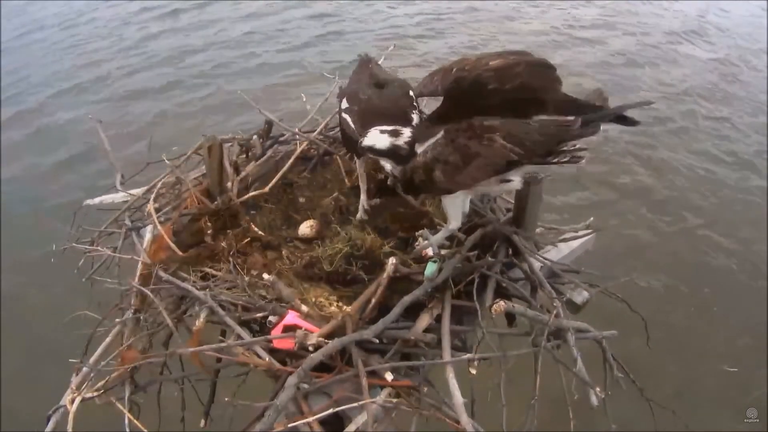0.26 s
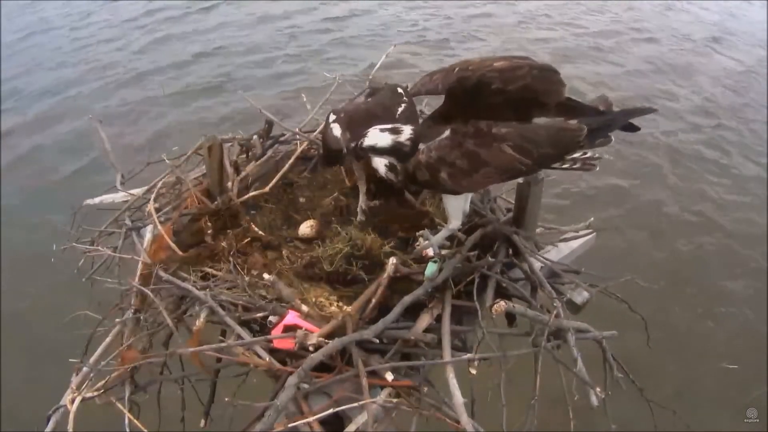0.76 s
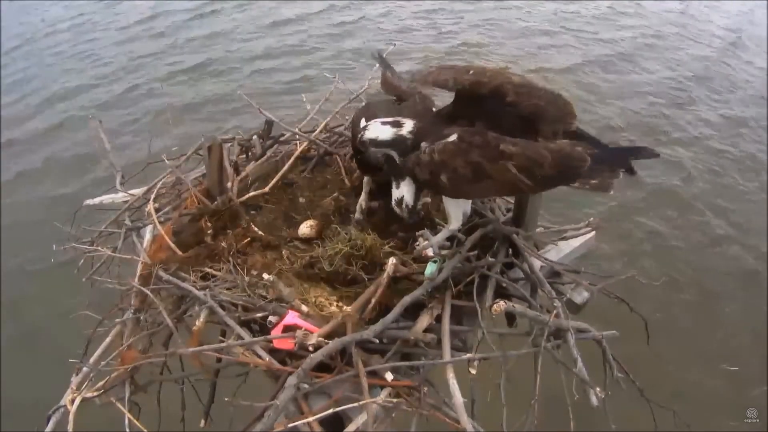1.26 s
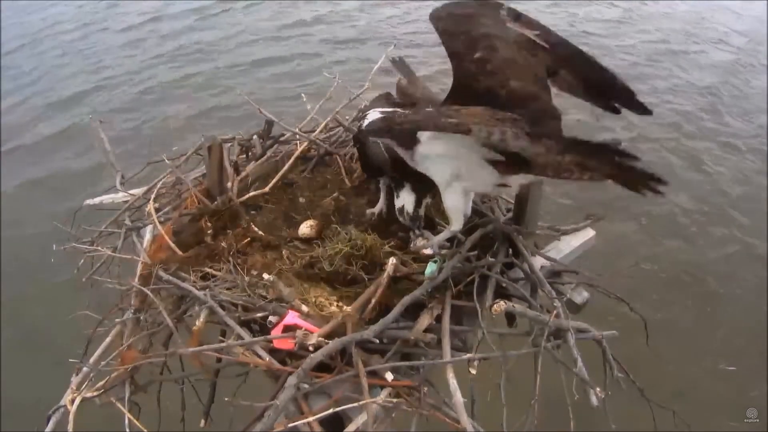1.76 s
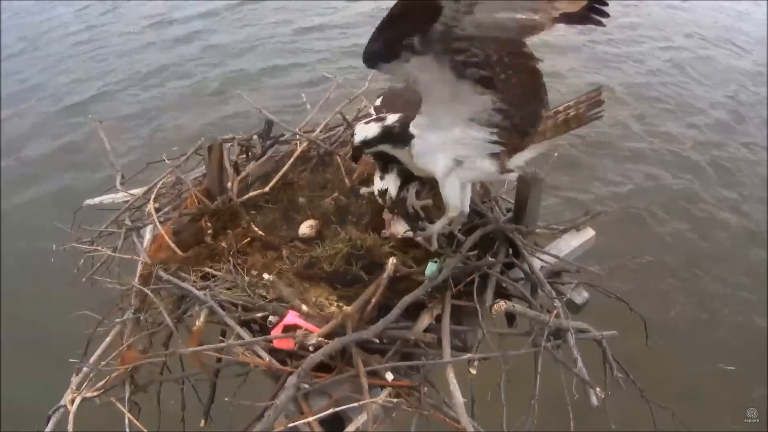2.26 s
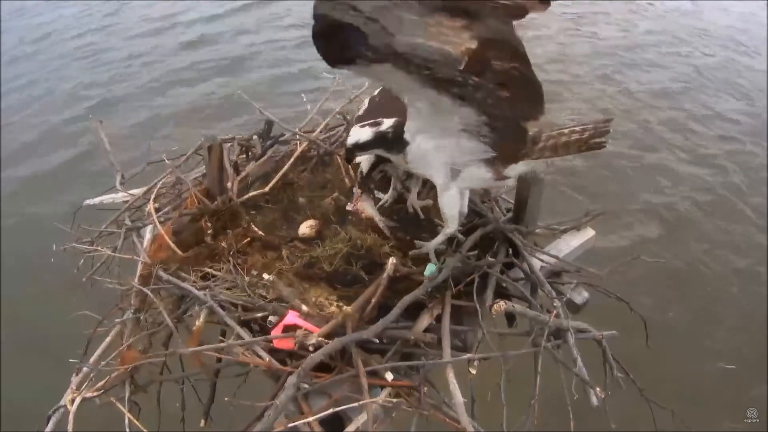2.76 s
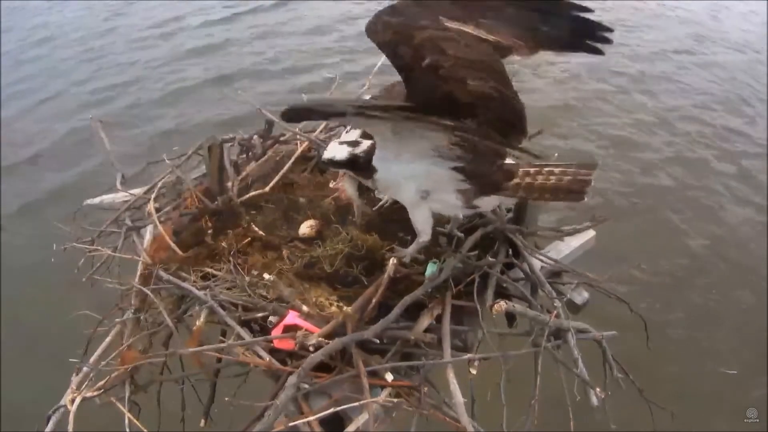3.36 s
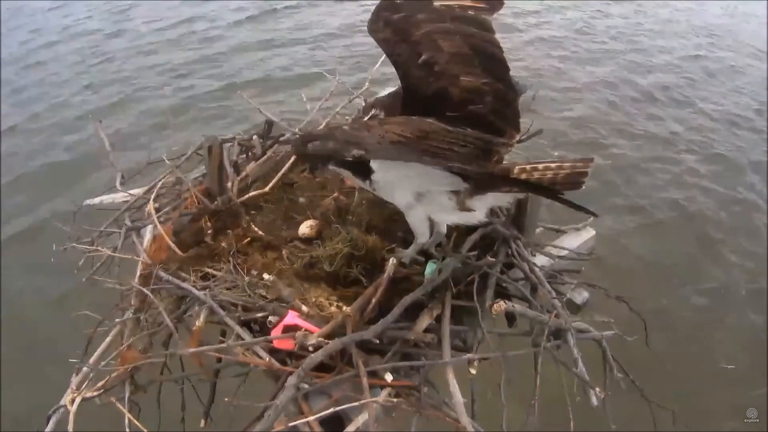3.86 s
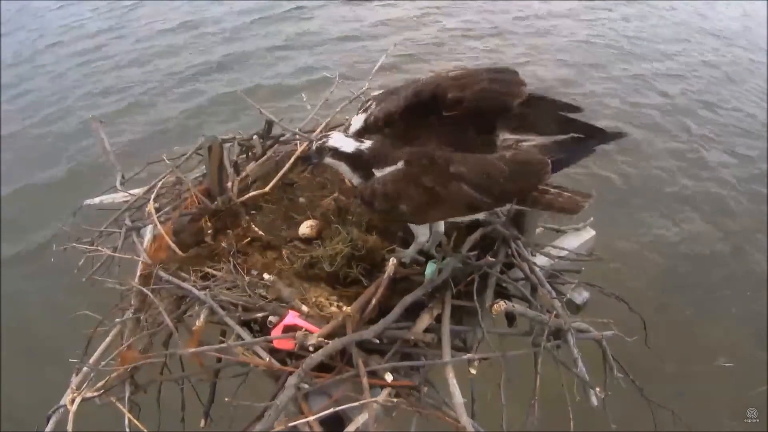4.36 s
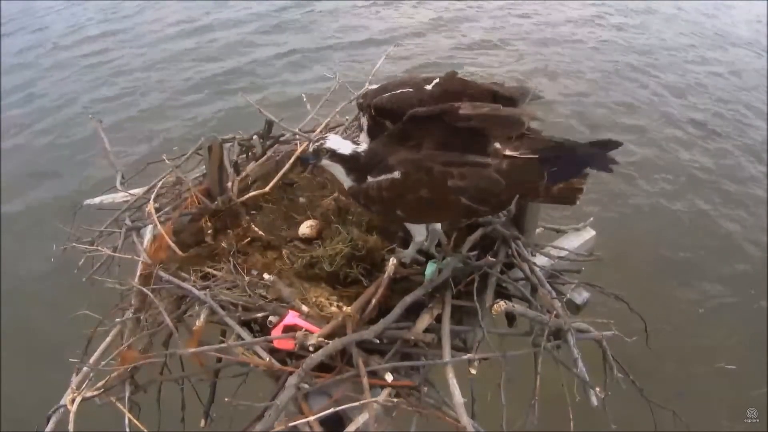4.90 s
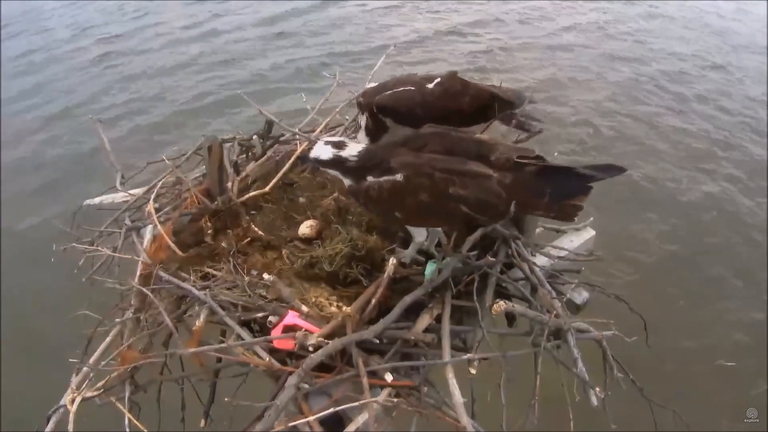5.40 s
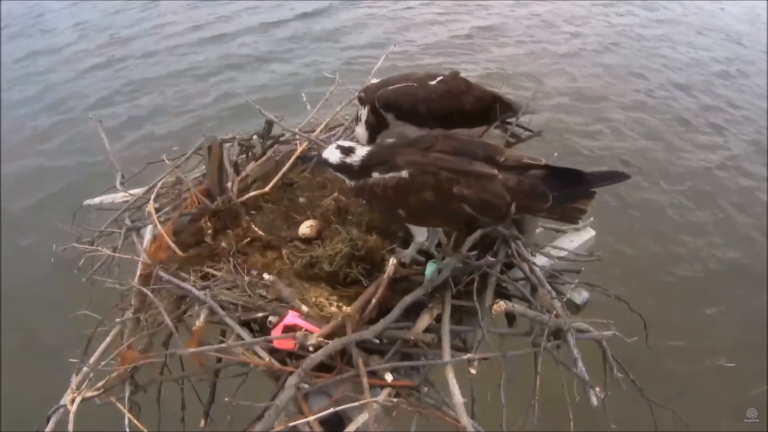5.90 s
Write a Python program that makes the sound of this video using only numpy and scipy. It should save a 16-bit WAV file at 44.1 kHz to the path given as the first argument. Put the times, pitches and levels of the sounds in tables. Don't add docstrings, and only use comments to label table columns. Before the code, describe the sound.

Close, piercing bird chirps tumble out rapidly, then give way to spaced, breathy, cracking whistles above a quiet hiss of open water.

```python
import sys
import numpy as np
from scipy import signal
from scipy.fft import rfft, irfft
from scipy.io import wavfile
from scipy.ndimage import uniform_filter1d

SR = 44100
rng = np.random.default_rng(int(sys.argv[2]) if len(sys.argv) > 2 else 0)


def wav_out(sig):
    wavfile.write(sys.argv[1], SR, np.round(np.clip(np.atleast_2d(sig).T, -1, 1) * 32767).astype(np.int16))


def natural_amplitude(level_db):
    exponent = np.asarray(level_db, float) / 20
    return 10 ** exponent


N = 270774


def at_level(x, db):
    return x * natural_amplitude(db) / np.sqrt(np.mean(x ** 2))


def ring(x, hz, width):
    return signal.lfilter(*signal.iirpeak(hz, hz / width, fs=SR), x)


def walk(rate):
    k = int(SR / rate)
    steps = np.repeat(rng.standard_normal(N // k + 1), k)
    return 1.58 * uniform_filter1d(uniform_filter1d(steps, k), k)[:N]


def unroll(table):
    s, *columns = np.transpose(table)
    at = np.arange(int(s[0] * SR), min(int(s[-1] * SR), N))
    cut = at[-1] == N - 1
    to_end = s[-1] * SR + 88 * cut - at
    fade = np.clip(np.minimum(at - at[0], to_end) / (.002 * SR), 0, 1)

    def glide(column):
        return uniform_filter1d(np.interp(at / SR, s, column), size=88)

    return at, fade, glide, columns


def peaked(s, rise, fall, hz, db, edges_db, octave_db=None):
    levels = (db + edges_db[0], db, db + edges_db[1])
    rows = np.transpose([(s - rise, s, s + fall), hz, levels])
    if octave_db is None:
        return rows
    return np.c_[rows, rows[:, 2] + octave_db + (-4.5, 0, -19.5)]


def whistles(notes, flutter_db, steady_db):
    out, flutter, tremble = np.zeros(N), walk(190), walk(400)
    chaos = (walk(340) + 1j * walk(340)) / np.sqrt(2)
    for note in notes:
        at, fade, glide, (hz, *partials_db) = unroll(note)
        pitch = glide(hz)
        phase = 2 * np.pi * np.cumsum(pitch * (1 + .002 * tremble[at])) / SR
        weak = (steady_db - glide(np.max(partials_db, axis=0))) / 16
        hurried = np.abs(np.gradient(pitch)) * SR / 1.3e5
        rough = np.clip(np.maximum(weak, 0) + hurried, .05, .8)
        swing = np.sqrt(1 - rough ** 2) + rough * chaos[at]
        for k, db in enumerate(partials_db):
            loudness = glide(natural_amplitude(db / 3)) ** 3
            wave = np.imag(swing * np.exp(1j * (k + 1) * phase))
            out[at] += fade * loudness * np.sqrt(2) * wave
    return out * natural_amplitude(flutter_db * flutter)


# (start [s], length [s], top pitch [Hz], level [dB], swell [dB])
ARCHES = [
    (.128, 0.056, 4816, -29.5, .1),
    (.372, 0.059, 4827, -24.5, 1),
    (.615, 0.065, 4827, -26, 4.5),
    (.853, 0.057, 4684, -31, -17.5),
    (1.096, 0.084, 4710, -26, -3.5),
]
# (time [s], depth [dB], lasting step [dB])
CATCHES = [
    (.167, -7, -4),
    (.414, -13, -5),
    (.665, -12.5, -0.5),
    (.871, -5, -1.5),
    (1.131, -9, -1.3),
    (1.157, -14, -5),
]


def arches():
    notes = []
    u = np.linspace(-1, 1, num=60)
    for s, length, hz, db, swell_db in ARCHES:
        t = s + length * (u + 1) / 2
        level_db = db + swell_db * u / 2 - 28 * np.abs(u) ** 3.7
        for catch, depth_db, step_db in CATCHES:
            level_db = level_db + depth_db * np.exp(-((t - catch) / .002) ** 2)
            level_db = level_db + step_db * (t > catch) * (catch > s)
        notes.append(np.transpose([t, hz - 455 * u ** 2, level_db]))
    return notes


# (peak time [s], rise [s], fall [s], pitch [Hz], level [dB])
PEEPS = [
    (.081, 0.021, 0.018, 4524, -34.5),
    (0.299, .006, .025, 4506, -34),
    (.317, 0.015, 0.013, 4490, -34.5),
    (.545, 0.0086, 0.036, 4360, -45.5),
    (.807, .011, 0.0098, 4480, -31.5),
    (1.035, 0.018, 0.014, 4480, -31),
    (1.295, 0.016, 0.013, 4420, -37),
]


def peeps():
    return [peaked(s, rise, fall, (hz, hz, hz), db, (-23.5, -24)) for s, rise, fall, hz, db in PEEPS]


# (start [s], length [s], from pitch [Hz], to pitch [Hz], level [dB])
STROKES = [(0.112, .022, 4220, 3150, -60.5), (0.337, .012, 4740, 5010, -39), (0.346, .013, 5140, 4500, -42),
           (.35, .022, 4020, 3180, -42.5), (0.566, 0.023, 4130, 4170, -52),
           (0.581, 0.024, 5240, 4470, -37.5), (0.594, 0.024, 3950, 3285, -41.5),
           (0.775, 0.022, 4680, 5780, -61.5), (0.818, 0.046, 4400, 3220, -50.5),
           (1.06, 0.023, 3760, 4010, -40), (1.073, 0.021, 4020, 3230, -44),
           (1.268, .018, 4800, 5450, -46.5), (1.314, .022, 4250, 4020, -48),
           (1.328, 0.061, 4070, 4510, -37.5), (1.367, .05, 5140, 5280, -39.5),
           (1.409, .022, 5290, 4750, -48), (1.902, 0.021, 4050, 3250, -38),
           (1.979, 0.028, 3770, 2824, -42.5), (2.192, 0.019, 4440, 6300, -41),
           (2.208, 0.028, 6370, 5650, -43.5), (2.232, 0.02, 4130, 3980, -40),
           (2.247, 0.015, 4010, 3150, -33.5), (2.316, 0.019, 3460, 2970, -39), (6.09, .05, 4100, 3980, -57)]


def strokes():
    notes = []
    u, landing = np.linspace(0, 1, num=20), .75
    travel = np.sin(np.pi / 2 * np.clip(u / landing, 0, 1)) ** 2
    for s, length, from_hz, to_hz, db in STROKES:
        level_db = db + np.interp(u, (0, landing, 1), (-10, 0, -15))
        notes.append(np.transpose([s + length * u, from_hz + (to_hz - from_hz) * travel, level_db]))
    return notes


# (peak time [s], rise [s], fall [s], pitch [Hz], level [dB])
TAILS = [
    (.195, 0.014, .01, 2680, -54),
    (0.443, 0.023, .014, 2650, -48),
    (.692, 0.014, 0.011, 2700, -55),
    (.922, 0.02, .013, 2690, -51.5),
    (1.2, .01, 0.0066, 2690, -52),
    (1.228, .015, 0.019, 2410, -57.5),
    (2.193, 0.0063, 0.0113, 2660, -50.5),
    (2.906, .05, .019, 2027, -52),
    (3.05, 0.0054, 0.013, 2480, -54),
]


def tails():
    notes, speed = [], 25000
    for s, rise, fall, hz, db in TAILS:
        pitches = (hz + speed * min(rise, .02), hz, hz - speed * fall / 4)
        notes.append(peaked(s, rise, fall, pitches, db, (-12.5, -15.5)))
    return notes


# (start [s], length [s], upper pitch [Hz], upper level [dB], lower level [dB])
RASPS = [
    (2.814, 0.045, 4100, -48.5, -57),
    (3.491, 0.082, 4140, -46.5, -59),
    (3.987, .125, 4080, -43, -60),
    (4.716, 0.1, 4260, -46, -59),
]


def rasps():
    notes = []
    for s, length, hz, db, low_db in RASPS:
        up = length * .88
        notes.append(peaked(s + up, up, length - up, (hz * .99, hz, hz * .98), db, (-10, -11)))
        notes.append(peaked(s + up, up, length - up, (3220, 3220, 3220), low_db, (1.5, -1.5)))
    return notes


# (time [s], pitch [Hz], effort [dB], octave over fundamental [dB])
HOLDS = [
    [(2.594, 2823, -40.5, -2.5), (2.648, 2823, -37, 13.5), (2.707, 2917, -35, -7.5), (2.759, 2949, -37, -6),
     (2.798, 3052, -35, 6.5), (2.817, 3050, -39.5, -16)],
    [(3.213, 2860, -41, -5), (3.235, 2913, -38.5, -1.5), (3.3, 2852, -42, -10.5), (3.4, 2940, -41, -5.5),
     (3.418, 3037, -40.5, 7), (3.483, 3077, -42, -9)],
    [(3.78, 2840, -42.5, -1.5), (3.82, 2938, -42.5, 1.5), (3.908, 2871, -42.5, -8), (3.975, 2953, -39, 12)],
    [(4.431, 2886, -38, 2), (4.5, 2827, -38.5, -5), (4.604, 2943, -43.5, -12), (4.67, 3037, -34, 12.5),
     (4.703, 3078, -38.5, -6.5)],
    [(5.768, 2840, -41, -11), (5.845, 2790, -39, -15), (5.886, 2935, -43.5, 3), (5.899, 2948, -50.5, 7),
     (6.001, 2970, -54.5, -4.5)],
]


def holds():
    notes = []
    for s, hz, db, beak_db in map(np.transpose, HOLDS):
        low_db = db - 10 * np.log10(1 + natural_amplitude(2 * beak_db))
        rows = np.transpose([s, hz, low_db, low_db + beak_db])
        attack = rows[0] + (-.008, 0, -13, -27)
        crack = rows[-1] * (1, 1.05, 1, 1) + (.014, 0, -4, -23)
        notes.append([attack, *rows, crack])
    return notes


# (peak time [s], fall [s], pitch [Hz], level [dB], octave [dB])
GRACES = [(.275, 0.011, 2940, -46.5, -13), (0.523, .01, 2845, -40.5, -3.5), (.997, 0.012, 2080, -53.5, -32),
          (1.004, 0.0065, 2900, -38.5, -5.5), (1.266, 0.01, 2904, -36.5, -8.5),
          (2.149, 0.037, 2660, -33, -8.5), (2.584, .01, 2006, -40, 0), (3.201, 0.018, 2020, -35, -5.5),
          (3.771, 0.016, 2180, -40, -28.5), (4.416, 0.017, 2100, -36.5, -13),
          (5.747, 0.02, 2007, -46.5, -11)]


def graces():
    notes, rise, speed = [], .009, 11000  # s, Hz per second
    for s, fall, hz, db, octave_db in GRACES:
        pitches = hz + speed * np.array([-rise, 0, fall])
        notes.append(peaked(s, rise, fall, pitches, db, (-26.5, -24.5), octave_db))
    return notes


# (peak time [s], fall [s], pitch [Hz], level [dB], octave [dB])
DROPS = [
    (1.185, 0.015, 2690, -36, -14),
    (1.454, 0.027, 2580, -44.5, -4),
    (1.722, 0.03, 2585, -46.5, 0),
    (1.999, .014, 2590, -32, -4),
    (2.336, 0.016, 2615, -26, -2),
    (6.14, 0.018, 2787, -38, -13.5),
]


def drops():
    return [peaked(s, .007, fall, (hz * 1.09, hz, hz * .91), db, (-21.5, -39.5), octave_db)
            for s, fall, hz, db, octave_db in DROPS]


# (start [s], length [s], pitch [Hz],
# level [dB], octave [dB])
ENDS = [
    (1.985, .056, 2480, -35.5, -12),
    (2.852, 0.061, 2808, -33, -3.5),
    (3.566, 0.051, 2826, -35.5, 2.5),
    (4.102, 0.054, 2790, -37, -0.5),
    (4.799, 0.051, 2842, -35, -1.3),
]
# (share of length, pitch ratio, level [dB], octave level [dB])
END_SHAPE = [(0, 1.14, -8, -28), (.17, 1.08, -15.5, -25), (.225, 1.029, -2.5, 0.5), (.5, 1, 0.5, 0.5),
             (.72, .975, -4.5, -6), (1, .96, -27.5, -20.5)]


def ends():
    notes = []
    share, ratio, fall_db, octave_fall_db = np.transpose(END_SHAPE)
    for s, length, hz, db, octave_db in ENDS:
        low_db = db + fall_db
        notes.append(np.transpose([s + length * share, hz * ratio, low_db, low_db + octave_db + octave_fall_db]))
    return notes


def voice():
    high = peeps() + arches() + strokes() + tails() + rasps()
    low = graces() + drops() + holds() + ends()
    low = [np.c_[note, np.array(note)[:, 3] - 26] for note in low]
    return whistles(high, 1.5, -37) + whistles(low, .8, -47)


def puff_shape(s, hold, db, swell_db, release):
    end_db = db + swell_db
    times = (s - .012, s, s + hold, s + hold + release)
    return np.transpose([times, (db - 15, db, end_db, end_db - 23.5)])


# (start [s], hold [s], level [dB], swell [dB])
BREATH = [(.06, .04, -69.5, -3), (.14, .04, -54, 0), (.28, 0.046, -57.5, -7.5), (.37, 0.061, -48, -2),
          (.533, 0.059, -53, -8), (.608, 0.069, -43.5, -8), (.79, .045, -71.5, 2), (.868, 0.038, -49, -4.5),
          (1.005, 0.064, -51, -8.5), (1.085, 0.086, -49, 2), (1.26, 0.19, -60, 10),
          (1.764, .002, -65.5, -1), (1.908, 0.005, -46.5, -3.5), (1.98, 0.023, -52.5, 3.5),
          (2.151, 0.042, -48.5, -10.5), (2.205, 0.045, -55, 8.5), (2.258, .065, -51, 8.5)]
# (start [s], hold [s], level [dB], swell [dB])
BREATH_SLOW = [
    (2.595, .18, -51, -5),
    (2.798, .085, -56.5, 8.5),
    (3.201, .286, -54, -5.5),
    (3.499, .09, -58.5, 6.5),
    (3.781, .245, -56.5, -2.5),
    (4.024, 0.1, -61, 10),
    (4.411, .3, -57.5, 4),
    (4.708, .12, -54, 0),
    (5.744, .16, -67, -2.5),
    (5.926, 0.25, -69, 9.5),
]
# (centre [Hz], width [Hz])
THROAT = [(2040, 120), (2430, 140), (3200, 300), (4060, 240), (4520, 130), (4800, 220), (5350, 450),
          (5900, 450), (6900, 230)]
THROAT_DB = [(-20.5, -14, -3.5, -3, -3.5, -4.5, 0, -5, -5), (-1, 2, -5, -2.5, -4.5, -3, -3, 1, -4)]


def breath():
    flow = np.zeros((2, N))
    for kind, (puffs, release) in enumerate(((BREATH, .022), (BREATH_SLOW, .045))):
        for puff in puffs:
            at, fade, glide, (db,) = unroll(puff_shape(*puff, release))
            flow[kind, at] = np.maximum(flow[kind, at], fade * natural_amplitude(glide(db)))
    out = np.zeros(N)
    for (hz, width), chirp_db, call_db in zip(THROAT, *THROAT_DB):
        band = at_level(ring(ring(rng.standard_normal(N), hz, width), hz, width), -6)
        flicker = natural_amplitude(2.5 * walk(40) + 1.6 * walk(9))
        out += band * flicker * (flow[0] * natural_amplitude(chirp_db) + flow[1] * natural_amplitude(call_db))
    return out * natural_amplitude(1.5 * walk(300))


def scatter(bird):
    t = np.arange(int(.2 * SR)) / SR
    echoes = rng.standard_normal(len(t)) * np.exp(-np.log(1000) * t / .12) * (t > .003)
    return natural_amplitude(-19.5) * signal.fftconvolve(bird, echoes / np.linalg.norm(echoes))[:N]


# (centre [Hz], width [Hz], level [dB])
HOUSING = [
    (2550, 6, -11),
    (3070, 14, -24),
]


def housing(bird):
    return sum(natural_amplitude(db) * ring(bird, hz, width) for hz, width, db in HOUSING)


# (time [s], level [dB], centre [Hz], length [s])
THUMPS = [
    (1.953, -60.5, 1134, .02),
    (2.373, -59.5, 255, 0.04),
    (2.595, -59.5, 603, 0.044),
    (2.619, -57.5, 230, 0.059),
    (3.048, -63, 710, 0.013),
    (3.59, -53, 207, 0.046),
    (4.442, -66, 900, 0.0315),
]


def thumps():
    out = np.zeros(N)
    t = np.arange(int(.15 * SR)) / SR
    for s, db, hz, length in THUMPS:
        burst = at_level(ring(ring(rng.standard_normal(len(t)), hz, hz), hz, hz), db)
        out[int(s * SR):][:len(t)] += burst * np.clip(t / .0046, 0, 1) * np.exp(-(t / length) ** 2)
    return out


# (time [s], level [dB])
GUST = [
    (0, -66),
    (1.4, -65),
    (2.5, -60),
    (3.9, -61.5),
    (4.15, -54),
    (4.4, -67),
    (4.7, -60.5),
    (5.1, -66),
    (6.14, -66),
]


def wind():
    s, gust_db = np.transpose(GUST)
    rumble = at_level(ring(ring(rng.standard_normal(N), 37, 50), 37, 50), 0)
    return rumble * natural_amplitude(np.interp(np.arange(N) / SR, s, gust_db) + 1.8 * walk(4.24))


# (frequency [Hz], level per Hz [dB])
AIR = [(88, -28.5), (150, -1.5), (828, -14), (1210, -13), (2570, -18), (2980, -12), (3290, -20.5),
       (6560, -16.5), (7600, -25.5), (9880, -57), (16700, -120)]


def water():
    hz, db = np.transpose(AIR)
    log_hz = np.log(np.arange(N // 2 + 1) * SR / N + 1)
    colour = natural_amplitude(np.interp(log_hz, np.log(hz), db))
    hiss = irfft(rfft(rng.standard_normal(N)) * colour, N)
    surf = at_level(ring(rng.standard_normal(N), 87, 110), -65)
    return at_level(hiss, -64.5) * natural_amplitude(.3 * walk(5)) + surf


# (centre [Hz], width [Hz], level [dB])
HUM = [
    (1212.4, 28, -73),
    (1617, 5.5, -78.5),
    (3065, 230, -77),
]


def hum():
    return sum(natural_amplitude(2 * walk(3.01)) * at_level(ring(rng.standard_normal(N), hz, width), db)
               for hz, width, db in HUM)


def scene():
    bird = voice() + breath()
    return (bird + scatter(bird) + housing(bird) + thumps() + wind() + water() + hum())[None]


def roll_off(x):
    return signal.sosfilt(signal.butter(12, 7800, fs=SR, output="sos"), x)


DROPOUTS = [
    4.5102,
    5.0860,
    6.0460,
]


def record(dry):
    t, x = np.arange(N) / SR, dry
    for s in DROPOUTS:
        x = x * np.clip((np.abs(t - s - .008) - .0076) / .0008, 0, 1)
    x = signal.sosfilt(signal.ellip(9, .3, 88, 7550, fs=SR, output="sos"), x)
    hiss = natural_amplitude(-90) * rng.standard_normal(N)
    return roll_off(x + hiss)


dry = scene()
out = record(dry)
wav_out(out)
```